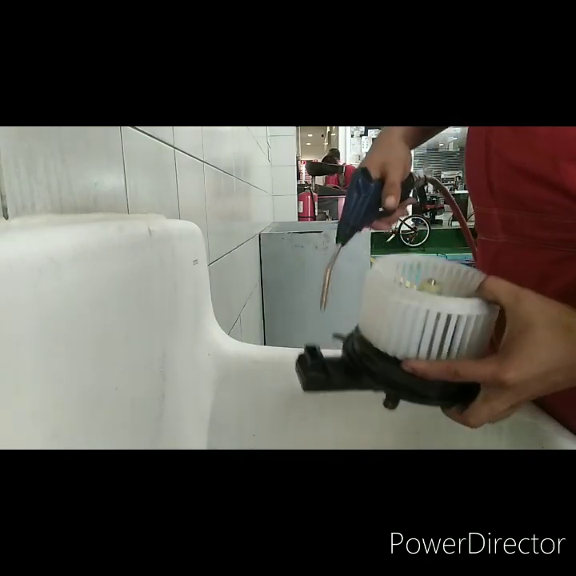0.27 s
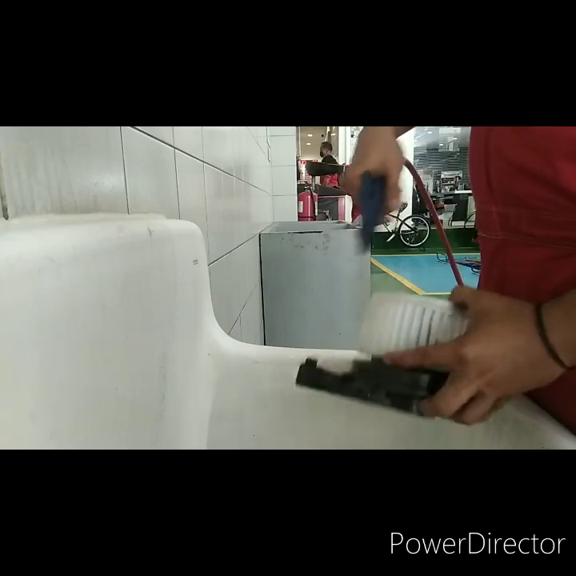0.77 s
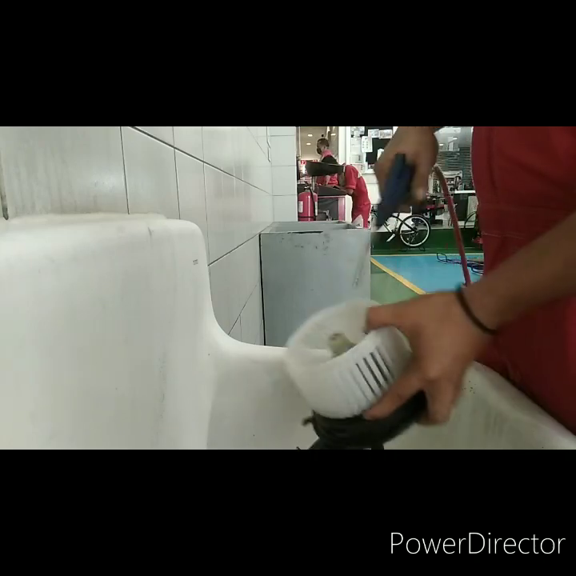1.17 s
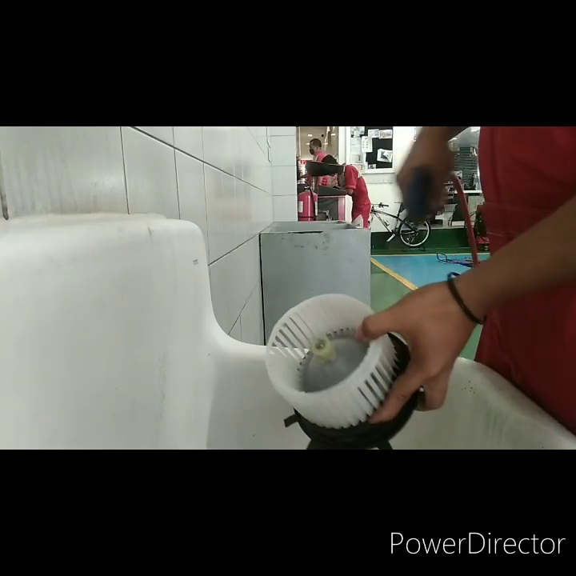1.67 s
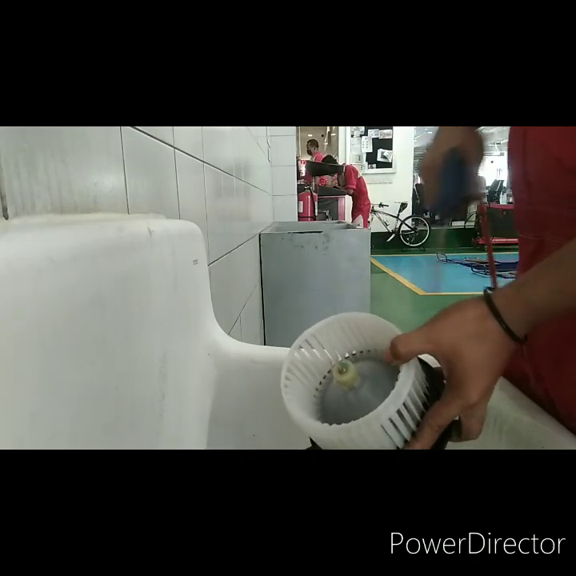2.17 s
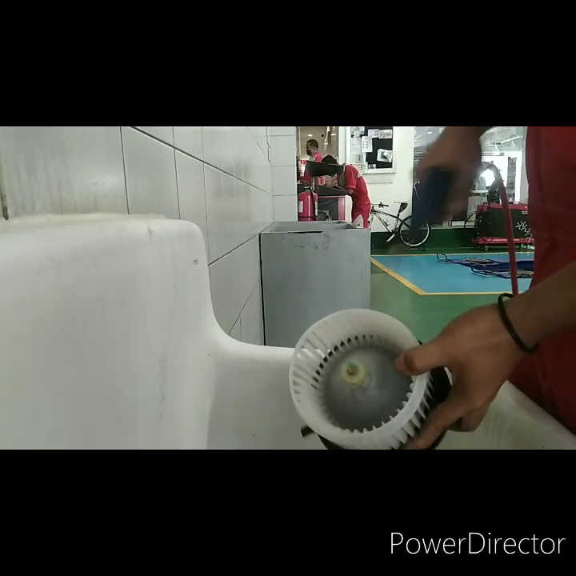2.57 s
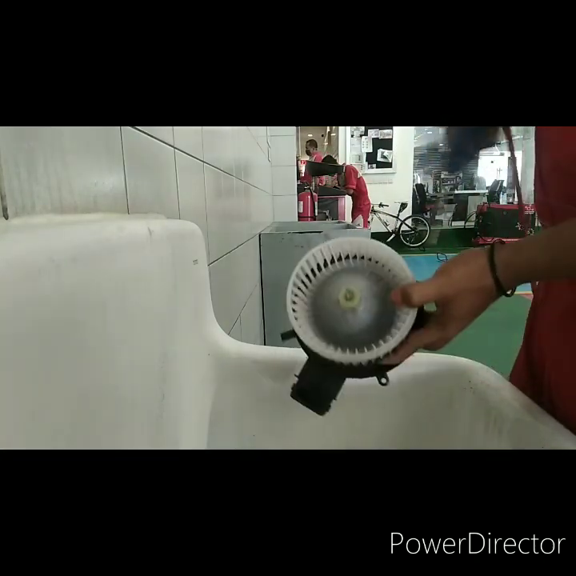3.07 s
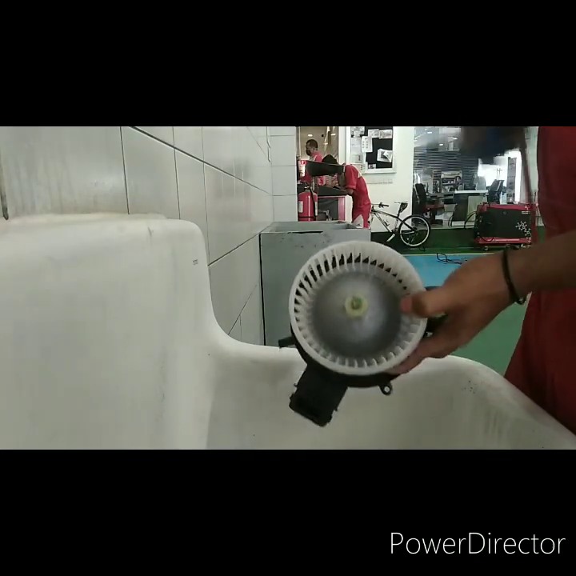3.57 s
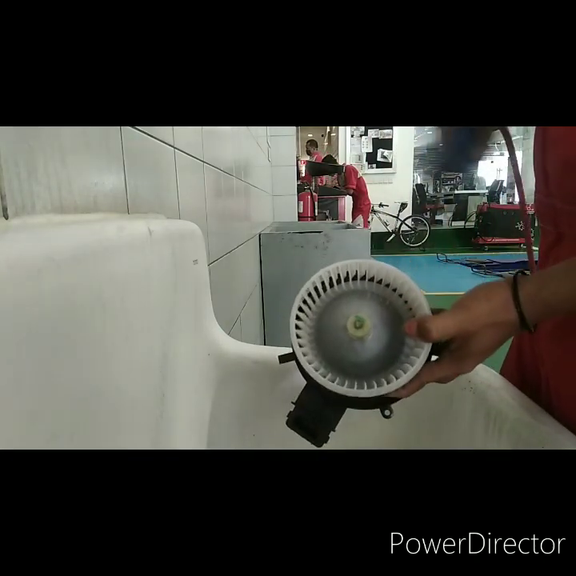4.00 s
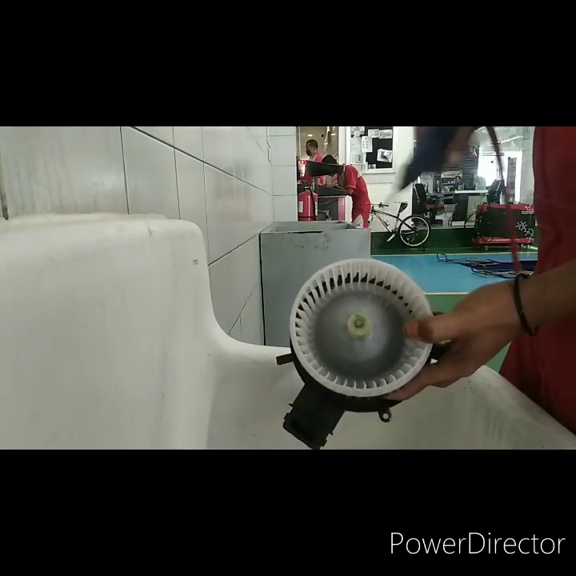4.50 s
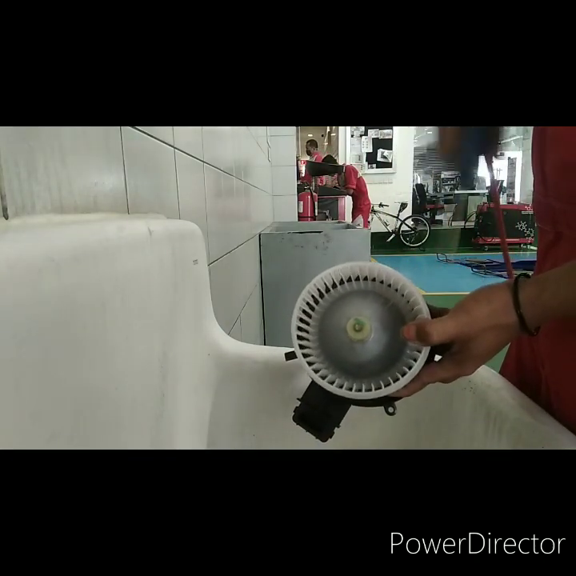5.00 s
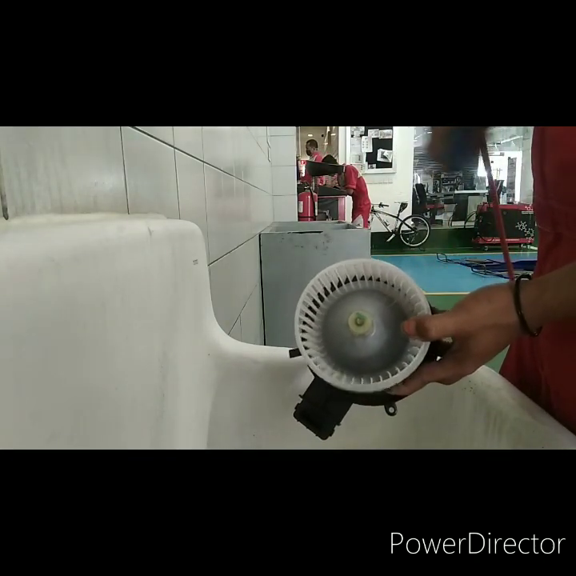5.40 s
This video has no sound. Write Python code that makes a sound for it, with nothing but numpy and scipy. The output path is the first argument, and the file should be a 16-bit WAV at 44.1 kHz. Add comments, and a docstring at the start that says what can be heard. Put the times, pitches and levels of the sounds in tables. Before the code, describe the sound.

In a hard-walled workshop, the faint hissy tail of an earlier air blast dies away for about a quarter second. Then a compressed-air gun opens abruptly, with a breathy whistle and a tiny faint toot. It hisses loudly to the end, swept to and fro over a plastic blower wheel, so bright hiss and duller rush alternate. The close stereo microphone is buffeted by deflected air, gusty at left, steadier at right.

```python
"""A compressed-air gun blows the dust out of a plastic blower wheel over a sink in a workshop.
The hall still rings from the last blast when the trigger is squeezed again; a brief toot of sines follows.
The jet is shaped noise: nozzle hiss, edge hiss, blade hiss, rush and an early breathy whistle, swelling and
sagging as the hand sweeps to and fro. Deflected air buffets two microphone ports as lumpy low noise.
The treble flickers at random in narrow bands; a low drone and one brief hum lie underneath."""
import sys
import numpy as np
from scipy import signal
from scipy.fft import rfft, irfft, next_fast_len
from scipy.io import wavfile

SR = 44100
rng = np.random.default_rng(int(sys.argv[2]) if len(sys.argv) > 2 else 0)


def dump(signal):
    """Clip the signal to [-1, 1] and save it as 16-bit WAV at the path in sys.argv[1]."""
    limited = np.clip(np.atleast_2d(signal).T, -1, 1)
    pcm = np.round(limited * 32767).astype(np.int16)
    wavfile.write(sys.argv[1], SR, pcm)


N = 249165
TIME = np.arange(N) / SR   # [s]
FREQS = np.maximum(np.fft.rfftfreq(N, 1 / SR), 1)   # [Hz]
CUTOFF_HZ = 15620   # top of the sound

# Relative spectra of the hall's ring and its low drone: (frequency [Hz], density [dB])
HALL_COLOUR = [(100, -25), (600, -6.5), (1300, -10), (2400, 1.5), (4400, 2.5), (7000, -4), (10700, -9),
               (15500, -30)]
DRONE_COLOUR = [(30, -26), (80, -26), (125, -9), (163, 4), (205, 3), (300, -3), (600, -5), (1500, -15),
                (8000, -50)]
DRONE_DB = -58.5
HUM_S, HUM_LENGTH_S, HUM_DB = 0.078, 0.093, -58   # middle, length and level of the hum

OPEN_S, OPEN_RISE_S = 0.284, 0.0077   # the valve is half open; how fast it opens
# Free jet at the nozzle: (time [s], level [dB])
NOZZLE_LEVEL = [(.25, -18), (.65, -17.5), (.8, -18), (2.6, -17.5), (5.6, -18)]
# Shrill hiss of the fast jet core on the blade edges, as the aim slowly shifts: (time [s], level [dB])
EDGE_LEVEL = [(.25, -27), (.37, -14.5), (.62, -21), (1.0, -21), (1.7, -18.5), (3.0, -19.5), (3.6, -23.5),
              (4.2, -19.5), (5.6, -21)]
# Duller rush of the spread jet inside the wheel, as the aim slowly shifts: (time [s], level [dB])
RUSH_LEVEL = [(.27, -31), (.345, -33), (.4, -19.5), (.55, -19.5), (.85, -20), (1.05, -25), (2.0, -21),
              (2.65, -21.5), (3.6, -24.5), (3.8, -22), (5.6, -22)]
# Breathy whistle while the jet grazes the housing: (time [s], level [dB])
WHISTLE_LEVEL = [(.28, -23), (.34, -15.5), (.45, -16.5), (.585, -17.5), (.62, -35), (.8, -90)]
# Relative spectra of the jet's layers: (frequency [Hz], density [dB])
NOZZLE_COLOUR = [(60, -50), (140, -48), (390, -50), (1200, -38), (2150, -10), (2900, 0), (4400, -1),
                 (6700, -4.5), (7900, 4), (9800, -1.5), (11000, 4), (15000, 5.5)]
EDGE_COLOUR = [(300, -60), (2200, -35), (4500, -15.5), (6700, -9), (7900, -6.5), (9700, 1.5), (12000, -2.5),
               (15000, -12)]
RUSH_COLOUR = [(100, -53), (250, -34), (400, -8), (850, -0.5), (2800, 4), (6800, 4), (8800, -13),
               (11000, -47), (15000, -27)]
# Stereo lean of the jet's layers: (frequency [Hz], left minus right [dB])
NOZZLE_BALANCE = [(400, -1.6), (1600, -0.17), (6000, -0.93), (10800, -1), (14500, 0.73)]
EDGE_BALANCE = [(4500, -2.5), (7900, 0), (9800, -3), (13000, -2.5)]
RUSH_BALANCE = [(250, 27), (600, -13.5), (1100, -7), (2800, -1), (15000, 2)]
# The hand swings the jet off the wheel and the rush sags: (middle [s], length [s], dip [dB])
SWINGS = [(0.732, 0.054, 10), (1.06, 0.12, 5), (1.188, 0.051, 1), (1.423, 0.13, 6), (1.667, 0.2, 6),
          (1.849, 0.2, 1.5), (2.105, 0.077, 12), (2.32, 0.11, 6), (2.54, 0.1, 6), (2.787, 0.042, 10),
          (3.02, 0.063, 9), (3.248, 0.059, 6), (3.445, 0.19, 2), (3.663, 0.04, 9), (3.893, 0.063, 6),
          (4.083, 0.056, 7), (4.308, 0.029, 4), (4.511, 0.037, 10), (4.732, 0.025, 4.5), (4.95, 0.052, 4.5),
          (5.168, 0.045, 10), (5.37, 0.047, 7.5), (5.568, 0.051, 5)]
# The jet cuts across the rim and the edge hiss flares: (middle [s], length [s], rise [dB])
CROSSINGS = [(0.774, 0.057, 3.5), (0.938, 0.16, 4.5), (1.14, 0.043, 4), (1.26, 0.09, 3.5),
             (1.51, 0.14, 3.5), (1.735, 0.044, 2.5), (1.793, 0.037, 1), (1.963, 0.2, 2), (2.2, 0.1, 2.5),
             (2.283, 0.034, 2), (2.433, 0.06, 2.5), (2.679, 0.05, 5.5), (2.88, 0.11, 2), (3.127, 0.056, 5),
             (3.247, .04, 3.5), (3.343, 0.035, 3.5), (3.442, 0.045, 5.5), (3.626, 0.021, 4.5),
             (3.791, 0.064, 7.5), (4.002, 0.055, 6.5), (4.195, 0.061, 5.5), (4.413, 0.067, 7),
             (4.616, 0.061, 7), (4.823, 0.11, 6), (5.048, 0.087, 6.5), (5.268, 0.049, 5.8),
             (5.477, .05, 5.5)]
# The jet passes the slots between the blades with a lower hiss: (middle [s], length [s], level [dB])
BLADE_PASSES = [(.84, .06, -23), (1.057, 0.21, -24.5), (1.293, 0.26, -24.5), (1.556, 0.14, -25),
                (1.69, 0.15, -22.5), (1.85, 0.075, -22.5), (1.987, 0.034, -19), (2.137, 0.15, -28.5),
                (2.44, .06, -26), (2.7, 0.074, -37), (2.85, 0.061, -30), (3.1, 0.11, -39),
                (3.785, 0.086, -30), (4.01, 0.066, -25), (4.168, 0.044, -23), (5.25, 0.09, -23)]
# Shares of a crossing's rise that the nozzle hiss gains and the rush loses
NOZZLE_FLARE, RUSH_LOSS = 0.081, 0.39
# Shares of a swing's dip that the unobstructed nozzle hiss gains and the gusts lose
NOZZLE_CLEAR, GUST_SAG = 0.1, 0.43

TOOT_S = 0.33   # start of the toot
# Tones of the toot: (frequency [Hz], peak level [dB], rise to the peak [s])
TOOT_TONES = [(610, -42, 0.013), (700, -48, 0.035), (1340, -53, 0.036)]

WIND_S, WIND_RISE_S = (0.385, 0.357), 0.0026   # wind half up at the left and right port; how fast
WIND_DB, LULL_DB = (-22, -24.5), -14.5   # full stream at left, right; left lull against full stream
WAVER_DB, WAVERS_PER_S = 0.76, 21   # depth and rate of the wind's chance wavering
# Relative spectrum of the wind: (frequency [Hz], density [dB])
WIND_COLOUR = [(25, -32), (55, -25.5), (82, -21.5), (115, -10.5), (160, -1), (250, -1), (400, -1.5),
               (830, -5), (1600, -9), (2200, -11.5), (3500, -20), (7000, -39), (15000, -57)]
# Stereo lean of the wind: (frequency [Hz], left minus right [dB])
WIND_BALANCE = [(60, 2), (150, 0), (350, -1), (1000, 1), (3000, 4)]
# The wheel throws air straight at the left port: (middle [s], length [s], strength [dB])
GUSTS = [(0.468, 0.24, -3.5), (0.624, 0.11, -9), (0.797, 0.047, -3), (0.853, 0.1, -5), (0.927, 0.026, -8),
         (0.962, 0.023, -3), (1.006, 0.024, -3), (1.15, 0.023, -3), (1.224, 0.018, -4), (1.277, 0.043, 0),
         (1.573, 0.14, -1.5), (1.737, .02, -5), (1.8, 0.018, -11), (2.007, 0.17, -3.5), (2.183, 0.053, -5),
         (2.26, 0.089, -3), (2.417, 0.037, -5), (2.48, 0.057, -2.5), (2.64, 0.049, -4), (2.728, 0.061, -5),
         (2.908, 0.17, -3), (3.08, 0.092, -4.5), (3.171, 0.032, -0.5), (3.32, 0.16, -2), (3.499, 0.022, -4),
         (3.573, 0.14, -2.5), (3.696, 0.027, -1.5), (3.8, 0.17, -3), (4.01, 0.18, -3), (4.205, 0.2, -4.5),
         (4.422, 0.23, -2.5), (4.68, 0.33, -2.5), (4.88, 0.084, -3), (5.019, 0.094, -2.5),
         (5.101, 0.084, -3), (5.27, 0.21, -4), (5.438, 0.084, -1.5), (5.535, 0.065, -2.5),
         (5.64, 0.038, -4)]
# The jet misses the wheel and the right port's wind drops: (middle [s], length [s], dip [dB])
MISSES = [(0.727, 0.14, 1), (1.358, 0.012, 6), (1.44, 0.039, 4), (1.763, .025, 3), (2.11, 0.04, 2.5),
          (2.795, 0.053, 5.5), (3.02, 0.029, 7), (3.648, 0.016, 3)]

# Random part of the flickering gain: (frequency [Hz], level against the steady part [dB])
FLICKER_COLOUR = [(1500, -13), (3200, 4), (6500, 12.5), (9000, -0.5), (15000, 2)]
FLICKER_DECAY_S, FLICKER_HZ = 0.0041, 12.3   # longer decay, narrower bands; how fast the gains change
FRAME_SIZE = 1024   # [samples]


def from_db(db):
    """Decibels to gain."""
    return 10 ** (np.asarray(db) / 20)


def rms_one(x):
    """Scale to unit rms."""
    return x / np.sqrt(np.mean(x ** 2) + 1e-20)


def level(rows):
    """Gain over time from (time [s], level [dB]) rows; silent before the first."""
    s, db = np.transpose(rows)
    return from_db(np.interp(TIME, s, db, left=-np.inf))


def over_hz(points):
    """A (frequency [Hz], level [dB]) table joined on a log-frequency axis."""
    hz, db = np.transpose(points)
    return np.interp(np.log(FREQS), np.log(hz), db)


def drift(rate):
    """Slow chance wandering of rms 1, independent at each port; rate in Hz."""
    noise = rfft(rng.standard_normal((2, N)))
    return rms_one(irfft(noise / (1 + (FREQS / rate) ** 2), N))


def turbulence(colour, balance=None, lumps_db=0, lump_rate=100):
    """Stereo noise of rms 1, made lumpy by eddies, then coloured."""
    eddies = rng.standard_normal((2, N)) * from_db(lumps_db * drift(lump_rate))
    lean = 0 if balance is None else over_hz(balance) * np.array([[.5], [-.5]])
    gain = from_db(over_hz(colour) + lean) * (FREQS < CUTOFF_HZ)
    return rms_one(irfft(rfft(eddies) * gain, N))


def filtered(x, gain):
    """Apply a gain per frequency, with silence added after the sound against wrap-around."""
    size = next_fast_len(N + SR // 2)
    size_gain = np.interp(np.fft.rfftfreq(size, 1 / SR), FREQS, gain)
    return irfft(rfft(x, size) * size_gain, size)[..., :N]


def resonance(hz, width):
    """Air noise ringing in one resonance; stereo, rms 1."""
    gain = 1 / (1 + (2 * (FREQS - hz) / width) ** 2)
    return rms_one(filtered(rng.standard_normal((2, N)), gain))


def swell(s, length, order):
    """A bump of height 1 around a moment; a higher order flattens its top."""
    distance = np.abs(2 * (TIME - s) / length)
    return np.exp(-np.minimum(distance, 10) ** order)


def opening(s, rise):
    """Gain that climbs smoothly from 0 to 1, half way at s."""
    return .5 + .5 * np.tanh((TIME - s) / (2 * rise))


def workshop():
    """The last blast dies away in the hall as stereo noise, over a low drone and a brief hum in mono."""
    tail = from_db(-37.0 - 25 * TIME) * turbulence(HALL_COLOUR)   # fades 25 dB per second
    drone = from_db(DRONE_DB) * turbulence(DRONE_COLOUR)[0]
    hum_noise = resonance(hz=165, width=74)[0]
    hum = from_db(HUM_DB) * swell(HUM_S, HUM_LENGTH_S, order=6) * hum_noise
    return tail + drone + hum


def swing_sag():
    """How far the jet is swung off the wheel over time, as a dip in dB."""
    return sum(db * swell(s, length, order=2) for s, length, db in SWINGS)


def jet():
    """Turbulent air hisses at nozzle, edges and blades and rushes in the wheel; it whistles at first."""
    flare_db = sum(db * swell(s, length, order=6) for s, length, db in CROSSINGS)
    sag_db = swing_sag()
    nozzle_gain = level(NOZZLE_LEVEL) * from_db(NOZZLE_FLARE * flare_db + NOZZLE_CLEAR * sag_db)
    nozzle = nozzle_gain * turbulence(NOZZLE_COLOUR, NOZZLE_BALANCE)
    edge = level(EDGE_LEVEL) * from_db(flare_db) * turbulence(EDGE_COLOUR, EDGE_BALANCE)
    rush_gain = level(RUSH_LEVEL) * from_db(-sag_db - RUSH_LOSS * flare_db)
    rush = rush_gain * turbulence(RUSH_COLOUR, RUSH_BALANCE, lumps_db=2.06, lump_rate=12)
    blade_gain = sum(from_db(db) * swell(s, length, order=2) for s, length, db in BLADE_PASSES)
    blades = blade_gain * resonance(hz=5300, width=4600)
    whistle = level(WHISTLE_LEVEL) * resonance(hz=8900, width=4900)
    return opening(OPEN_S, OPEN_RISE_S) * (nozzle + edge + rush + blades + whistle)


def toot():
    """Just after the jet starts, a brief toot of sines rises and dies away."""
    age = np.maximum(TIME - TOOT_S, 0)
    tones = 0
    for hz, db, rise in TOOT_TONES:
        envelope = age / rise * np.exp(1 - age / rise)
        tones = tones + from_db(db) * envelope * np.sin(2 * np.pi * hz * age)
    return tones


def gust_strength():
    """How hard the wheel throws the air at the left port over time; about 1 in a full gust."""
    gusts = [from_db(db) * swell(s, length, order=6) for s, length, db in GUSTS]
    return np.max(gusts, axis=0)


def port_wind():
    """Eddies hit each port on their own: gusts at the left, a stream with a few misses at the right."""
    miss_db = sum(db * swell(s, length, order=4) for s, length, db in MISSES)
    gusts = gust_strength() * from_db(-GUST_SAG * swing_sag())
    exposure = np.array([np.maximum(gusts, from_db(LULL_DB)), from_db(-miss_db)])
    flow = np.array([opening(s, WIND_RISE_S) * from_db(db + WAVER_DB * waver)
                     for s, db, waver in zip(WIND_S, WIND_DB, drift(WAVERS_PER_S))])
    return flow * exposure * turbulence(WIND_COLOUR, WIND_BALANCE, lumps_db=2.5, lump_rate=380)


def flickering(x):
    """The treble flickers at random in narrow bands, independently at each port."""
    overlap = FRAME_SIZE * 3 // 4
    hz, _, frames = signal.stft(x, SR, nperseg=FRAME_SIZE, noverlap=overlap)
    count = frames.shape[-1]
    # slowly wandering noise; the first half lets the wandering settle
    keep = np.exp(-2 * np.pi * FLICKER_HZ * FRAME_SIZE / 4 / SR)
    chance = rng.standard_normal((2, FRAME_SIZE, 2 * count))
    wander = signal.lfilter([1], [1, -2 * keep, keep ** 2], chance)[..., count:]
    # a decaying weight before the transform ties neighbouring frequencies into bands
    decay = np.exp(-np.arange(FRAME_SIZE) / SR / FLICKER_DECAY_S)[:, None]
    bands = rfft(wander * decay, axis=1)
    depth = from_db(np.interp(hz, FREQS, over_hz(FLICKER_COLOUR)))[:, None]
    # the division keeps the average power about the same
    gain = np.abs(1 + depth * bands / np.std(bands)) / np.sqrt(1 + depth ** 2)
    return signal.istft(frames * gain, SR, nperseg=FRAME_SIZE, noverlap=overlap)[1][:, :N]


def scene():
    """Jet and hall with flickering treble, plus the brief toot and the port wind."""
    return flickering(jet() + workshop()) + toot() + port_wind()


def record(dry):
    """The tallest peaks are rounded off, and the top is cut steeply."""
    rounded = dry / (1 + (dry / .8) ** 8) ** (1 / 8)
    return filtered(rounded, 1 / np.sqrt(1 + (FREQS / CUTOFF_HZ) ** 600))


dry = scene()
out = record(dry)
dump(out)
```